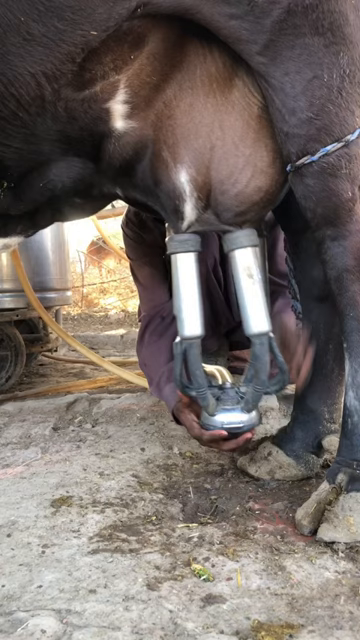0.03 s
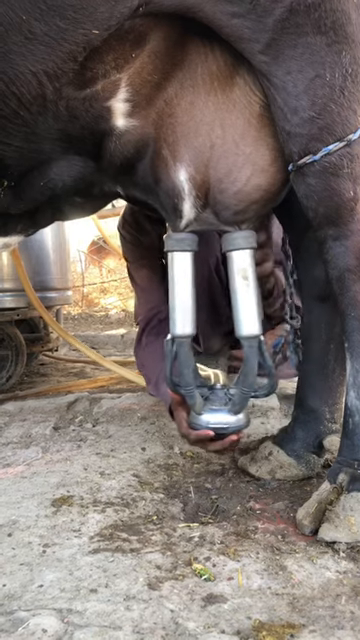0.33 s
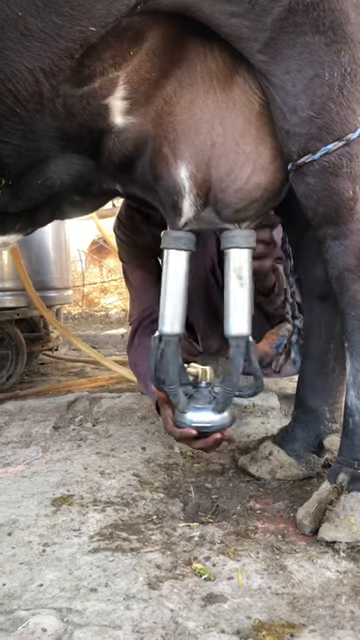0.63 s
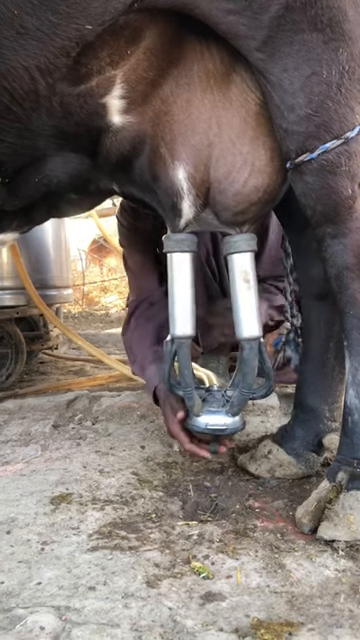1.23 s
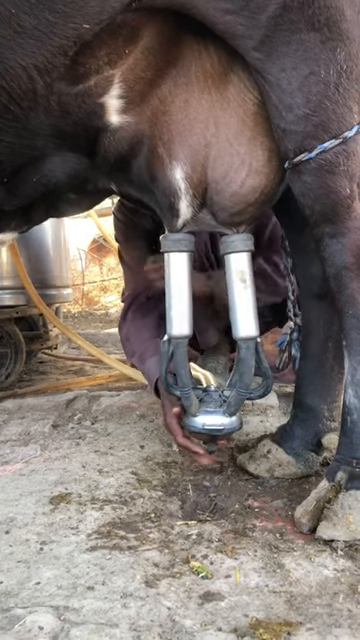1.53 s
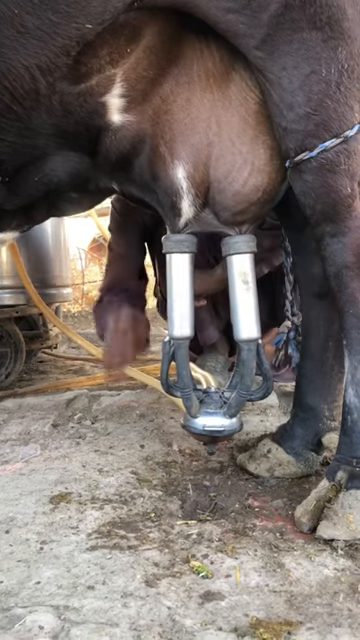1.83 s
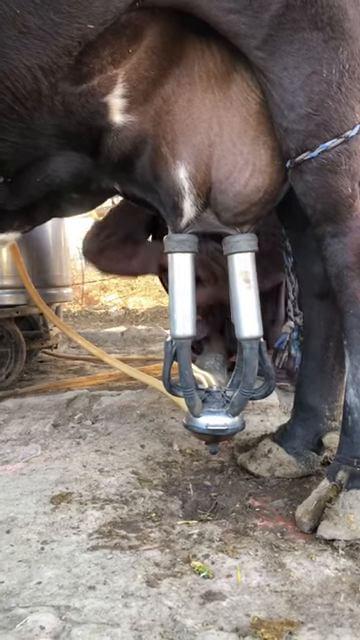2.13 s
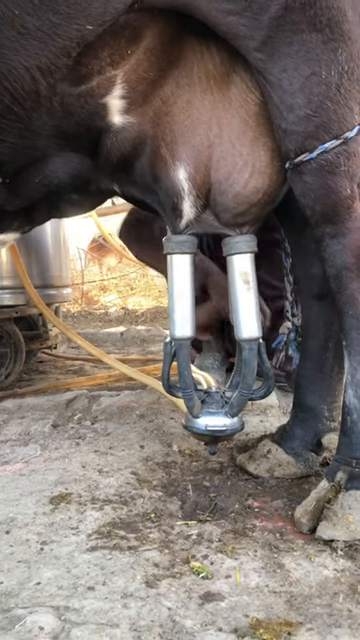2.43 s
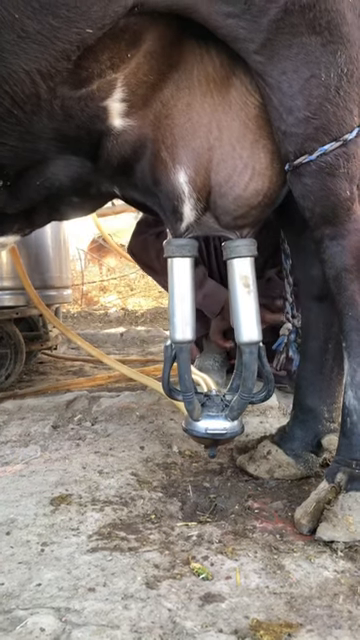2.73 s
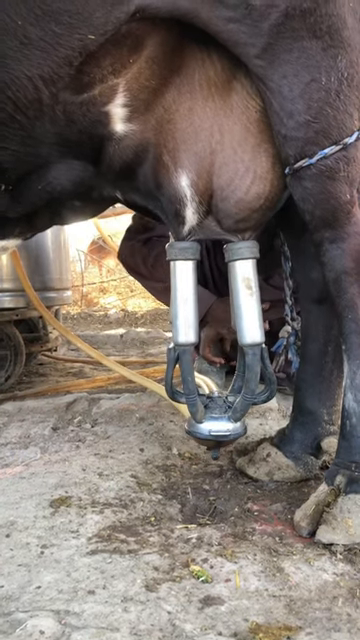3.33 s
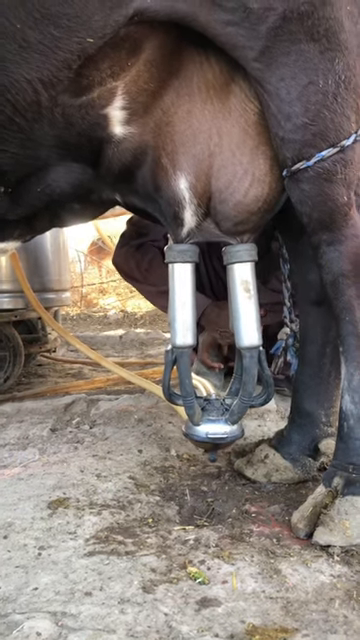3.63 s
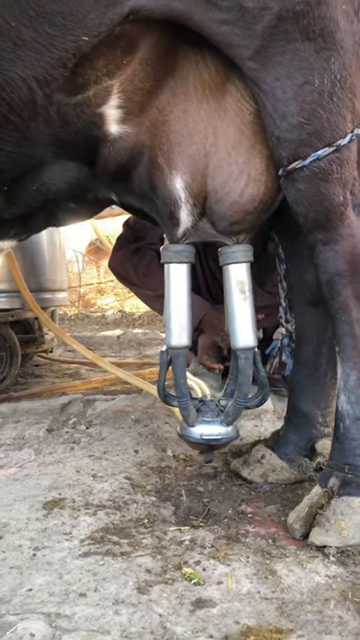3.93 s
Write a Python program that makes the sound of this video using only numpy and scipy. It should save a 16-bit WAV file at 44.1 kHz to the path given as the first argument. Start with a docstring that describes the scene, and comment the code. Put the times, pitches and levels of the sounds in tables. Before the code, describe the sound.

Steady low hum of a milking machine pump, with soft pulsing air puffs and dull knocks.

```python
"""Milking machine in an open dairy yard

One microphone beside the udder. The four-vane vacuum pump hums, rattles and rings thinly, and air leaks in at a
teat cup until it seals with a soft, low thump; other low thumps come later. About once a second the pulsator
lets out a soft puff, with a dull knock on the return stroke. The milker's sleeve rustles, cluster and chain
tick, a hiss fades, a bird chirps far off and metal snaps near the end."""
import sys
import numpy as np
from scipy import signal
from scipy.fft import rfft, irfft
from scipy.io import wavfile

SR = 44100
rng = np.random.default_rng(int(sys.argv[2]) if len(sys.argv) > 2 else 0)


def generate_wav(signal):
    """Clip the signal to [-1, 1] and save it as 16-bit WAV at the path in sys.argv[1]."""
    frames = np.transpose(np.atleast_2d(signal))
    scaled = np.clip(frames, -1, 1) * 32767
    pcm = np.round(scaled).astype(np.int16)
    wavfile.write(sys.argv[1], SR, pcm)


N = 176400
T = np.arange(N) / SR

# bright spectrum of rustles and ticks: (frequency [Hz], relative density [dB])
HANDLING_SPECTRUM = [(300, 0), (1500, -29), (3000, -6), (4800, -9), (6200, 7.5), (7500, -6), (10500, -3),
                     (12800, 5), (14200, -1), (16000, -3)]


def from_db(db):
    """Decibels to gain."""
    return 10 ** (np.asarray(db) / 20)


def unit_power(x):
    """Scale to an rms of one."""
    return x / np.sqrt(np.mean(x ** 2) + 1e-20)


def in_time(rows):
    """Each column of a timed table as a curve of straight lines."""
    times, *columns = np.transpose(rows)
    return [np.interp(T, times, column) for column in columns]


def filtered(x, hz, kind):
    """A gentle low, high or band pass."""
    return signal.sosfilt(signal.butter(2, hz, kind, fs=SR, output="sos"), x)


def coloured(x, spectrum):
    """Give a steady excitation a spectrum; unit power."""
    hz, db = np.transpose(spectrum)
    bin_hz = np.maximum(np.arange(N // 2 + 1) * SR / N, 1)
    gain = from_db(np.interp(np.log(bin_hz), np.log(hz), db))
    return unit_power(irfft(rfft(x) * gain, N))


def noise(spectrum):
    """Smooth noise with a spectrum; unit power."""
    return coloured(rng.standard_normal(N), spectrum)


def drift(rate_hz, step=40):
    """A smooth random wander with a spread of one."""
    pole = np.exp(-2 * np.pi * step * rate_hz / SR)
    white = rng.standard_normal(N // step + 2002)
    slow = signal.lfilter([1], [1, -2 * pole, pole * pole], white)[2000:]
    return np.interp(np.arange(N) / step, np.arange(len(slow)), unit_power(slow))


def resonance(hz, width, gate=1):
    """One resonance excited by air noise, which may be gated; unit power."""
    edges = np.clip([hz - width / 2, hz + width / 2], 10, SR * .45)
    return unit_power(filtered(gate * rng.standard_normal(N), edges, "band"))


def wavering_rings(table, gate=1, wander_hz=14, swell_db=2.8):
    """Air-driven resonances, each wandering in pitch, swelling and fading."""
    out = np.zeros(N)
    for hz, width, db in table:
        ring = signal.hilbert(resonance(hz, width, gate))
        detune = np.exp(2j * np.pi * np.cumsum(wander_hz * drift(5)) / SR)
        out += from_db(db) * unit_power(np.real(ring * detune) * from_db(swell_db * drift(2.5)))
    return out


def envelope(start, attack, hold, t60):
    """Straight rise, hold, exponential release; all in seconds."""
    age = T - start
    return np.clip(age / attack, 0, 1) * from_db(-60 * np.clip((age - attack - hold) / t60, 0, 3))


def crack(start, attack, t60, tail_db, tail_t60):
    """Envelope of a hard contact: a fast decay with a faint tail."""
    return envelope(start, attack, 0, t60) + from_db(tail_db) * envelope(start, attack, 0, tail_t60)


def mode(start, hz, t60):
    """A struck mode: a sine that dies away."""
    return np.sin(2 * np.pi * hz * (T - start)) * envelope(start, 1 / SR, 0, t60)


def partials(angle, table, waver):
    """Tones locked to a rotation, each wavering a little in strength and timing."""
    out = np.zeros(N)
    for multiple, db in table:
        strength = from_db(db) * np.sqrt(2) * (1 + waver * drift(5.4))
        out += strength * np.cos(round(multiple) * angle + waver * drift(6.4))
    return out


def pump_hum(vane_angle, shaft_angle, wobble=.02):
    """Suction pulses, one per vane, make a low hum that wobbles with each turn of the shaft."""
    # hum at the microphone: (time [s], gain [dB], extra gain of the overtones [dB])
    hum_gain = [(0, 1, -0.5), (.35, 1.9, -0.05), (1.2, 0.6, -0.9), (2.2, 0.44, -1.5), (3.1, -0.5, -1.1),
                (4, -1, -1)]
    # fundamental, then overtones: (multiple of the vane rate, level [dB])
    harmonics = [(1, -27.5), (2, -31.5), (3, -41.5), (4, -59), (6, -58.5), (7, -66.5)]
    # the fifth harmonic fades on its own: (time [s], level [dB])
    fifth_level = [(0, -46.5), (.35, -46), (1.3, -45), (2.1, -47), (2.8, -51), (3.4, -52.5), (4, -60)]
    gain_db, overtones_db = in_time(hum_gain)
    fifth_db, = in_time(fifth_level)
    fundamental = partials(vane_angle, harmonics[:1], waver=.008)
    overtones = from_db(overtones_db) * partials(vane_angle, harmonics[1:], waver=.022)
    hum = -(fundamental + overtones) * from_db(gain_db) * (1 + wobble * np.cos(shaft_angle))
    fifth = from_db(fifth_db) * np.sqrt(2) * np.cos(5 * vane_angle) * (1 + .1 * drift(6))
    return hum + fifth


def shaft_rattle(shaft_angle, growth_db_per_s=1.0):
    """Unequal vanes rattle at multiples of the shaft rate, slowly coming forward."""
    # rattle tones: (multiple of the shaft rate, starting level [dB])
    tones = [(9, -63), (14, -72.5), (19, -64), (21, -60.5), (22, -66), (23, -58.5), (46, -70)]
    out = np.zeros(N)
    for multiple, db in tones:
        phase = round(multiple) * shaft_angle + rng.uniform(0, 2 * np.pi) + .33 * drift(2.9)
        out += from_db(db) * np.sqrt(2) * np.cos(phase)
    return from_db(growth_db_per_s * T) * out


def vacuum_pump(vanes=4, gate_depth=.15, rush_depth=.2, rush_db=-48.5):
    """The rotor hums, rattles and whines; each vane gates the air noise that excites exhaust and casing."""
    # pump speed: (time [s], vane rate [Hz])
    speed = [(0, 96.4), (.75, 96.45), (1.2, 96.15), (2, 96.25), (4, 96.05)]
    # thin whine: (multiple of the vane rate, level [dB])
    whine_tones = [(23, -72.5), (24, -75), (26, -67.5), (27, -69.5), (44, -71.5), (45, -73.5), (73, -75)]
    # exhaust resonances: (frequency [Hz], width [Hz], level [dB])
    exhaust_modes = [(433, 88, -57), (501.7, 47, -54), (581, 39.6, -54.5)]
    # casing resonances: (frequency [Hz], width [Hz], level [dB])
    casing_modes = [(1103, 30.3, -61), (2238, 30, -70), (4270, 170, -68), (4665, 93, -67.5),
                    (5355, 84, -67.5), (6920, 140, -70.5)]
    # swell of whine and casing together: (time [s], gain [dB])
    ring_gain = [(0, 4), (1.1, 5.5), (2.2, 2), (4, 1)]
    # rush of pump and yard: (frequency [Hz], relative density [dB])
    rush_spectrum = [(20, -32), (55, 5), (130, 0.5), (250, 0.5), (370, -2), (700, -8.5), (1000, -6),
                     (1300, -11), (1700, -8), (2000, -20), (2500, -10.5), (2900, -21), (3700, -23),
                     (4400, -23), (5050, -24.5), (5700, -15), (7100, -23), (10000, -26.5), (16000, -26.5)]
    vane_hz, = in_time(speed)
    ring_db, = in_time(ring_gain)
    vane_angle = 2 * np.pi * np.cumsum(vane_hz) / SR - np.pi / 2
    hum = pump_hum(vane_angle, vane_angle / vanes)
    rattle = shaft_rattle(vane_angle / vanes)
    whine = partials(vane_angle + np.pi / 2, whine_tones, waver=.3)
    gate = 1 + gate_depth * np.cos(vane_angle)
    exhaust = sum(from_db(db) * resonance(hz, width, gate) for hz, width, db in exhaust_modes)
    casing = wavering_rings(casing_modes, gate)
    pulsing_air = rng.standard_normal(N) * (1 + rush_depth * np.cos(vane_angle))
    rush = from_db(rush_db) * coloured(pulsing_air, rush_spectrum)
    return hum + rattle + exhaust + from_db(ring_db) * (whine + casing) + rush


def teat_cup_leak(seal_s=.315, rush_db=-45, flutter_db=2, whistle_fade_db_per_s=38):
    """Air sucked past a teat cup sounds its liner, whistles, then sizzles, and stops as the liner seals."""
    # inrushing air: (frequency [Hz], relative density [dB])
    rush_spectrum = [(200, 15), (700, -7), (1300, 4), (2300, -1.5), (3000, -2.5), (5200, -1), (7500, -8.5),
                     (16000, -25)]
    # whistles: (frequency [Hz], width [Hz], starting level [dB])
    whistle_modes = [(8620, 200, -46.5), (9740, 220, -53.5)]
    # resonances of the rubber liner: (frequency [Hz], width [Hz], level [dB])
    liner_modes = [(1152, 47, -60), (1700, 120, -57), (2170, 190, -58.5)]
    # fine sizzle of the closing gap: (time [s], level [dB])
    sizzle_level = [(0, -53), (.14, -43), (.24, -41), (.32, -43)]
    # its colour: (frequency [Hz], relative density [dB])
    sizzle_spectrum = [(3000, -11), (11500, -6), (14800, 4.5), (16000, -2.5)]
    sizzle_db, = in_time(sizzle_level)
    whistles = wavering_rings(whistle_modes) * from_db(-whistle_fade_db_per_s * T)
    liner = wavering_rings(liner_modes)
    sizzle = from_db(sizzle_db + flutter_db * drift(110)) * noise(sizzle_spectrum)
    rush = from_db(rush_db + flutter_db * drift(51)) * noise(rush_spectrum)
    gap_open = envelope(start=-1, attack=1, hold=seal_s, t60=.068)  # fully open from the start
    return (rush + liner + sizzle + whistles) * gap_open


def hiss():
    """A treble hiss that fades into the background."""
    # the fade: (time [s], level [dB])
    level = [(0, -45), (.5, -54.5), (1.2, -57), (1.8, -58), (2.6, -65), (4, -87)]
    # colour of the hiss: (frequency [Hz], relative density [dB])
    spectrum = [(300, -1), (1000, 5), (3000, 0), (6000, 2.5), (8000, -5), (16000, -2.5)]
    level_db, = in_time(level)
    return from_db(level_db) * noise(spectrum)


def chain_ticks():
    """Cluster and chain touch in small, bright cracks."""
    # contacts: (time [s], level [dB])
    ticks = [(0.311, -37), (0.421, -41), (.759, -45), (0.892, -44), (1.22, -43), (1.555, -46), (2.143, -47),
             (2.731, -49)]
    level = sum(from_db(db) * crack(start, attack=.00091, t60=.018, tail_db=-12, tail_t60=.17)
                for start, db in ticks)
    return level * noise(HANDLING_SPECTRUM)


def knocks(attack_s=.00108, mode_split_hz=55):
    """The pulsator's return and the teat cups clack dully and ring hollow in a close pair of modes."""
    # knocks: (time [s], clack level [dB], ring level [dB], ring pitch [Hz], ring t60 [s])
    strikes = [(0.312, -44, -33.5, 240, 0.066), (1.047, -44.5, -47.5, 955, 0.31),
               (1.223, -41, -43, 1800, 0.26), (1.981, -44.5, -38.5, 1023, .08),
               (2.972, -42.5, -41, 1044, .05)]
    # dull clack: (frequency [Hz], relative density [dB])
    spectrum = [(200, -35), (700, 1.5), (1000, 6), (1800, 1.5), (2600, -8.5), (16000, -46)]
    clack, out = noise(spectrum), np.zeros(N)
    for start, clack_db, ring_db, hz, t60 in strikes:
        out += from_db(clack_db) * clack * envelope(start, attack_s, hold=0, t60=.12)
        ring = mode(start, hz, t60) + .5 * mode(start + attack_s, hz + mode_split_hz, t60)
        out += from_db(ring_db) * ring
    return out


def low_thumps(width_s=.019, low_cut_hz=34):
    """A soft, low thump as the teat cup seals, and later other soft low thumps, each a swell a few cycles long."""
    # thumps: (time [s], level [dB], pitch [Hz])
    thumps = [(.318, -46, 144), (.6, -42, 65), (.85, -46, 55), (1.149, -43, 128), (1.42, -39, 62),
              (1.5, -38, 57), (1.55, -39.5, 128), (1.59, -37, 60), (1.68, -42, 147), (3.605, -39, 75)]
    out = np.zeros(N)
    for centre, db, hz in thumps:
        swell = np.exp(-.5 * ((T - centre) / width_s) ** 2)
        out += from_db(db) * np.sqrt(2) * swell * np.sin(2 * np.pi * hz * (T - centre) + drift(15))
    return filtered(out, low_cut_hz, "high")


def pulsator(attack_s=.0094, vent_round_trip_s=.0012, vent_echo=.26, split_hz=5700):
    """Each puff of air sounds hollow in its vent and dulls as the pressure falls."""
    # puffs: (time [s], level [dB], hold [s])
    puffs = [(0.696, -46, 0.024), (1.604, -45.5, 0.033), (2.569, -44, 0.021), (3.581, -43.5, 0.026)]
    # escaping air: (frequency [Hz], relative density [dB])
    spectrum = [(300, -13), (1500, 1.5), (2300, -7), (3000, -3), (4400, 2.5), (6300, -2), (7500, -11),
                (11000, -14), (16000, -15)]
    air = noise(spectrum)
    hollow = unit_power(air + vent_echo * np.roll(air, int(vent_round_trip_s * SR)))
    low = filtered(hollow, split_hz, "low")
    high = -filtered(hollow, split_hz, "high")  # inverted so the bands add in phase
    out = np.zeros(N)
    for start, db, hold in puffs:
        out += from_db(db) * low * envelope(start, attack_s, hold, t60=.5)
        out += from_db(db) * high * envelope(start, attack_s, hold, t60=.17)
    return out


def sleeve_rustles(grains_per_s=2900, spread_db=3, rise_s=.013):
    """Sleeve and hand brush in short bursts of tiny grains over a little smooth noise."""
    # rustles: (time [s], length [s], level [dB])
    rustles = [(0.801, 0.031, -49), (0.829, 0.033, -44.5), (0.883, 0.045, -53.5), (1.069, 0.055, -53),
               (2.119, 0.019, -55)]
    grains = (rng.random(N) < grains_per_s / SR) * rng.choice([-1, 1], N)
    strength = from_db(spread_db * np.minimum(rng.exponential(1, N), 4))
    cloth = coloured(grains * strength + .2 * rng.standard_normal(N), HANDLING_SPECTRUM)
    return cloth * sum(from_db(db) * envelope(start, rise_s, length - rise_s, t60=.065)
                       for start, length, db in rustles)


def far_bird(echo_db=-3, yard_t60_s=.25):
    """Thin gliding notes from a distance, followed by the echoes of the yard."""
    # notes: (time [s], length [s], from [Hz], to [Hz], bend [under 1 glides early], level [dB])
    chirps = [(1.14, 0.044, 4250, 2820, 1, -57), (1.17, 0.097, 6570, 5000, 3.4, -53),
              (1.29, 0.059, 6800, 4100, 1, -49), (1.351, 0.062, 2510, 4330, 0.29, -52),
              (1.444, 0.04, 3220, 3510, 0.46, -56)]
    song = np.zeros(N)
    for start, length, from_hz, to_hz, bend, db in chirps:
        progress = np.clip((T - start) / length, 0, 1)
        hz = from_hz + (to_hz - from_hz) * progress ** bend + 120 * drift(150)
        song += from_db(db) * np.sin(np.pi * progress) * np.sin(2 * np.pi * np.cumsum(hz) / SR)
    yard = rng.standard_normal(N) * from_db(-60 * np.minimum(T / yard_t60_s, 2))
    echoes = signal.fftconvolve(song, yard / np.linalg.norm(yard))[:N]
    return song + from_db(echo_db) * echoes


def metal_snap(ring_db=1, echo_s=.017, echo_db=-15):
    """Metal catches in quick contacts and rings on the last; a nearby wall sends it back."""
    # contacts: (time [s], level [dB])
    contacts = [(3.45, -36), (3.4533, -36), (3.456, -27.5)]
    # sharp click: (frequency [Hz], relative density [dB])
    spectrum = [(200, 6), (2500, -8), (3600, 2.5), (4800, -5), (10000, -4), (16000, -7.5)]
    clicks = np.zeros(N)
    for start, db in contacts:
        decay = crack(start, attack=.00021, t60=.014, tail_db=-23, tail_t60=.49)
        clicks += from_db(db) * noise(spectrum) * decay
    last_start, last_db = contacts[-1]
    ring = from_db(last_db + ring_db) * mode(last_start, hz=3580, t60=.01)
    echo = from_db(echo_db) * np.interp(T - echo_s, T, ring + .5 * clicks)
    return clicks + ring + echo


def scene():
    """The yard in mono, from beside the udder."""
    mix = (vacuum_pump() + teat_cup_leak() + hiss() + chain_ticks() + knocks() + low_thumps()
           + pulsator() + sleeve_rustles() + far_bird() + metal_snap())
    return mix[None]


def record(dry):
    """The top is cut steeply at 16 kHz."""
    return signal.sosfilt(signal.ellip(10, .2, 70, 16000, fs=SR, output="sos"), dry)


dry = scene()
out = record(dry)
generate_wav(out)
```